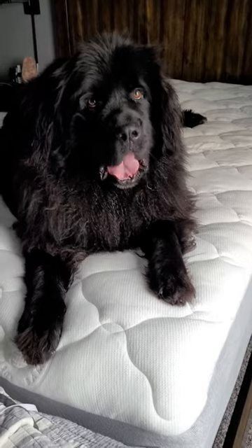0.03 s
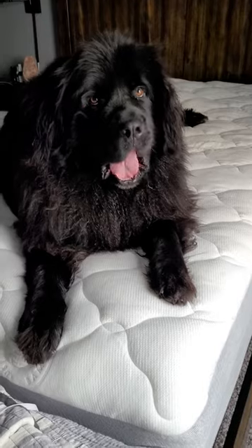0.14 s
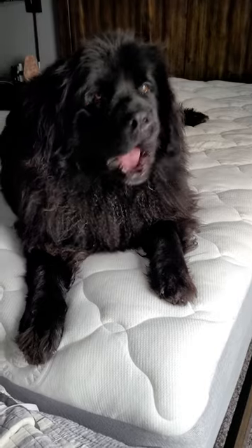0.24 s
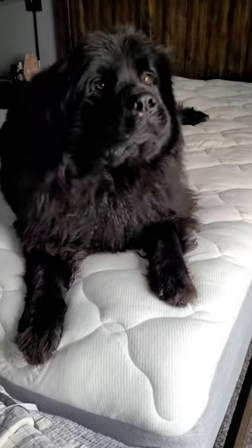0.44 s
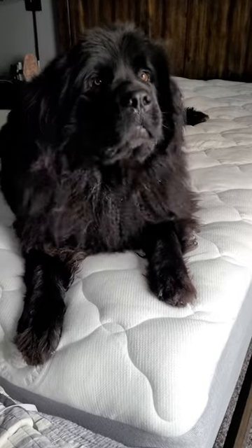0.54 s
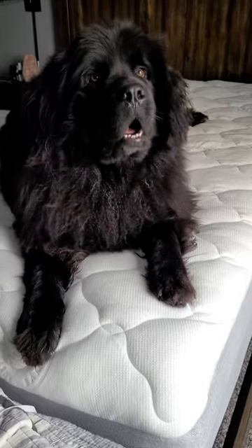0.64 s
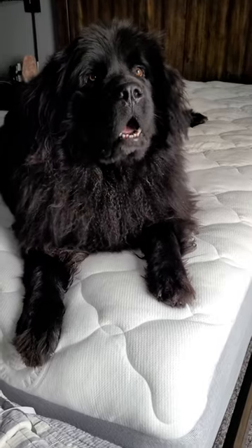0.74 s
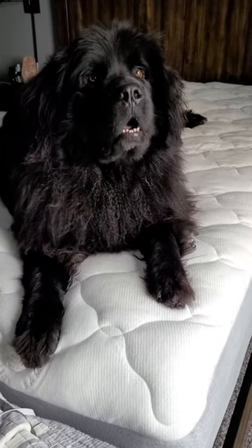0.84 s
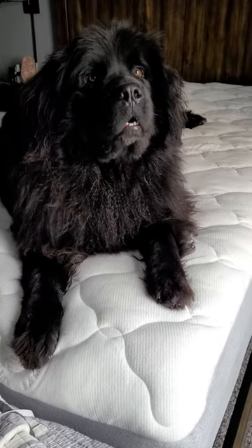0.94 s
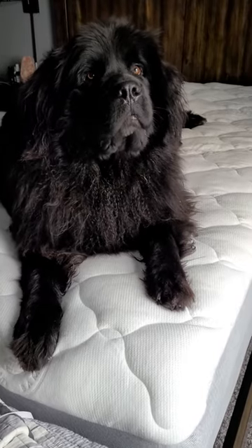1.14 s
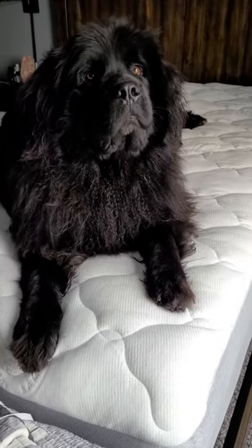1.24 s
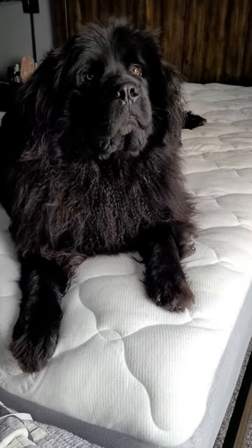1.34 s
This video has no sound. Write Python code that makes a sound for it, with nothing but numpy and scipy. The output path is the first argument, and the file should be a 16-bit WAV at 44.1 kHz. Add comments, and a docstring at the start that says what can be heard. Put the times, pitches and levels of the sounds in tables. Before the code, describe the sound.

A large dog gives one deep, loud bark between panting breaths in a small humming room

```python
"""In a small furnished room with a mains hum, a large dog on a bed gives one deep bark between panting breaths.
Pants are swells of coloured noise. The bark climbs from a closed-mouth growl, the jaws snap open, and
a second, falling tone takes over: two sums of overtones with a sum tone and pulsed air. Air hisses out after it.
Wall echoes and a decaying noise tail make the room. A phone's two ports hear it; its gain control
ducks under the bark and creeps back."""
import sys
import numpy as np
from scipy import signal
from scipy.fft import rfft, irfft, next_fast_len
from scipy.io import wavfile
from scipy.ndimage import uniform_filter1d, minimum_filter1d, map_coordinates

SR = 44100
rng = np.random.default_rng(int(sys.argv[2]) if len(sys.argv) > 2 else 0)


def dump_mix(stems):
    """Bounce the given channels to the path in sys.argv[1] as a 16-bit WAV at rate SR."""
    frames = np.atleast_2d(stems).T  # one column per channel
    limited = np.clip(frames, -1, 1)  # hard clip at full scale
    pcm = np.round(limited * 32767).astype(np.int16)
    wavfile.write(sys.argv[1], SR, pcm)


N = 61739
TOP_HZ = 15620  # upper band limit
RIGHT_LAG_S = 0.00013  # later arrival at the right port

# Opening of the jaws. Each row: time in seconds, opening from 0 (shut) to 1 (open).
MOUTH = [(.223, 0), (.227, 1), (.335, 1), (.355, .5), (.4, .2)]


def amp(db):
    """Level to gain: 20 dB is a factor of ten in amplitude."""
    return 10 ** (np.asarray(db) / 20)


def unit(x):
    """Normalise power: scale to rms 1."""
    return x / np.sqrt(np.mean(x ** 2) + 1e-20)


def along(points, hz):
    """Spectral envelope: interpolate (Hz, value) points on a logarithmic frequency axis."""
    f, values = np.transpose(points)
    return np.interp(np.log(hz + 1), np.log(f + 1), values)


def curves(rows):
    """Temporal envelope: one value per sample for each column after the time in seconds."""
    seconds, *columns = np.transpose(rows)
    return [np.interp(np.arange(N) / SR, seconds, column) for column in columns]


def wobble(rate):
    """Band-limited fluctuation: a smooth curve through random knots, rate of them a second."""
    knots = rng.standard_normal(int(N * rate / SR) + 4)
    return map_coordinates(knots, [np.arange(N) * rate / SR])


def filtered(x, response):
    """Linear filtering: multiply the spectrum by a complex response of frequency."""
    size = next_fast_len(N + SR // 2)
    spectrum = rfft(x, size) * response(np.fft.rfftfreq(size, 1 / SR))
    return irfft(spectrum, size)[..., :N]


def noise(spectrum):
    """Spectral shaping: coloured noise of rms 1, rolled off steeply below the first point."""
    def colour(hz):
        low_cut = np.minimum(1, hz / spectrum[0][0]) ** 4
        return amp(along(spectrum, hz)) * low_cut
    return unit(filtered(rng.standard_normal(N), colour))


def background():
    """Superposition and coherence: a steady two-tone hum over room tone partly alike at the two ports."""
    # Colour of the room tone. Each row: frequency in Hz, relative level in dB.
    air_colour = [(22, 0), (45, -1), (70, -8), (110, -10), (160, -13), (200, -11), (280, -18), (460, -12),
                  (600, -18), (740, -23), (850, -30), (1150, -38), (1320, -29), (1500, -39), (2500, -46),
                  (4000, -53), (9000, -55), (12500, -48), (15500, -57)]
    # Likeness of the room tone left and right. Each row: frequency in Hz, correlation from 0 to 1.
    alike = [(30, .8), (200, .95), (1000, .8), (4000, .4), (12000, .2)]
    hum_hz, hum_db, sixth_db = 119.8, -47, -32  # sixth harmonic relative to the fundamental
    air_db = -57.5

    t = np.arange(N) / SR - np.array([[0], [RIGHT_LAG_S]])
    fundamental = np.sin(2 * np.pi * hum_hz * t)
    sixth = amp(sixth_db) * np.sin(12 * np.pi * hum_hz * t)
    hum = np.sqrt(2) * amp(hum_db) * (fundamental + sixth)

    def mid_side(hz):
        # the cosine of twice this angle is the left-right correlation
        angle = np.arccos(np.clip(along(alike, hz), -1, 1)) / 2
        return np.array([np.cos(angle), np.sin(angle)])
    mid, side = filtered(np.array([noise(air_colour), noise(air_colour)]), mid_side)
    return hum + amp(air_db) * np.array([mid + side, mid - side])


def pants():
    """Turbulent flow through the mouth: each breath is a swell of coloured noise."""
    # Breaths. Each row: start, peak and end in seconds, level in dB at the peak before flutter.
    # A row whose end comes before its start stays silent.
    breaths = [(-.05, .045, 0.062, -50), (.54, .63, 0.68, -49.5), (.72, .82, 0.93, -74.5),
               (1.04, 1.11, 0.94, -75.5), (1.19, 1.24, 1.293, -79.5), (1.32, 1.39, 1.45, -71.5)]
    # Colour of the breath before the bark. Each row: frequency in Hz, relative level in dB.
    before = [(180, -23), (300, -5), (437, -20), (750, 0), (991, -14.5), (1850, -2), (2560, -17),
              (2780, -11.5), (3120, -25), (6200, -28), (7420, -33), (8600, -29.5), (15000, -43)]
    # Colour of the whistling breath after the bark. Each row: frequency in Hz, relative level in dB.
    whistling = [(410, -62), (700, -14), (786, -10), (1180, -21), (1350, 2), (1510, -16), (2190, -15.5),
                 (2940, -43.5), (3140, -22.5), (5170, -46), (5880, -33), (6350, -35), (15000, -42)]
    # Colour of the faint breaths at rest. Each row: frequency in Hz, relative level in dB.
    faint = [(700, -17), (1100, -10), (1320, 6), (1550, -12), (1900, 3), (2200, -9), (2650, -6),
             (3000, -17), (6000, -19), (15000, -48.5)]
    colours = [before, whistling, faint]

    t, out = np.arange(N) / SR, np.zeros(N)
    for k, (start, top, end, db) in enumerate(breaths):
        swell = np.sin(np.pi / 2 * np.interp(t, [start, top, end], [0, 1, 0])) ** 2
        level = amp(db + 1.3 * wobble(45))
        out += level * swell * noise(colours[min(k, 2)])
    return out


def folds(pitch):
    """Vocal-fold oscillation: the running phase is the integral of a slightly jittered pitch."""
    jitter = .004  # rms share of the pitch, at the knots
    hz, = curves(pitch)
    phase = 2 * np.pi * np.cumsum(hz * (1 + jitter * wobble(120))) / SR
    return hz, phase


def voice(rows, hz, phase):
    """Source and filter: harmonics of the folds weighted by the throat as the mouth opens."""
    # Throat with the mouth open. Each row: frequency in Hz, gain in dB.
    throat_open = [(120, -14), (250, -10.5), (480, -1), (620, 0), (820, -3), (1050, -12), (1400, -12),
                   (1800, -11), (2100, -17), (2500, -26.5), (3000, -53), (3900, -37.5), (4700, -49),
                   (6500, -41.5), (15500, -80)]
    # Throat with the mouth shut. Each row: frequency in Hz, gain in dB.
    throat_shut = [(120, -13.5), (350, 0), (700, -5), (1200, -20.5), (1500, -46.5), (2300, -39.5),
                   (3500, -70), (15500, -90)]
    shimmer_db = 1  # rms fluctuation of the level, at the knots

    db, odd_db, upper_db = curves(rows)
    mouth, = curves(MOUTH)
    live = db > db.min()
    k = np.arange(1, 41)[:, None]  # harmonic number
    f, opening = k * hz[live], mouth[live]
    throat_db = opening * along(throat_open, f) + (1 - opening) * along(throat_shut, f)
    source_db = odd_db[live] * (k % 2) + upper_db[live] * (k > 1)
    gains = amp(throat_db + source_db) * (f < TOP_HZ)
    harmonics = np.sin(k * phase[live] + np.pi * k * k / 4)  # staggered starting phases
    tone = np.zeros(N)
    tone[live] = np.sum(gains * harmonics, axis=0)
    return amp(db + shimmer_db * wobble(90)) * tone


def rasp(phase):
    """Modulated turbulence: air gated once a cycle of the folds leaves by the open mouth or the nose."""
    # Air through the folds. Each row: time in seconds, level in dB for the mouth, level in dB for the nose,
    # both before flutter, jaw opening and colour.
    rush = [(.167, -80, -90.5), (.170, -60, -43.5), (.195, -60, -46.5), (.221, -33, -55.5), (.228, 0, -71),
            (.245, 3.5, -70), (.265, 7, -70), (.285, 2.5, -70), (.335, -7, -69), (.35, -16.5, -73),
            (.38, -27, -65), (.42, -61.5, -94)]
    # Colour of the air in the open mouth. Each row: frequency in Hz, gain in dB.
    mouth_colour = [(200, -56.5), (400, -30), (800, -15), (1100, -15), (1600, -15.5), (2300, -19),
                    (2700, -29.5), (3000, -60), (3500, -43.5), (3900, -36), (4600, -62), (5200, -40),
                    (5700, -44.5), (6500, -29), (7500, -42.5), (8500, -38), (10000, -43.5), (12500, -37.5),
                    (14500, -68), (15500, -83)]
    # Colour of the air escaping with the mouth shut. Each row: frequency in Hz, gain in dB.
    nose_colour = [(300, -10.5), (1200, -7.5), (1500, -40.5), (2300, -30), (2800, -13.5), (3800, -10),
                   (4800, -40.5), (5500, -6), (6100, 2.5), (6700, -8.5), (7200, -40.5), (8700, -24),
                   (15500, -51)]

    mouth, = curves(MOUTH)
    open_db, shut_db = curves(rush) + 3.7 * wobble(70)
    gate = (1.2 + np.cos(phase)) ** 3
    air = unit(gate * rng.standard_normal(N))
    by_mouth = filtered(mouth * amp(open_db) * air, lambda hz: amp(along(mouth_colour, hz)))
    by_nose = filtered((1 - mouth) * amp(shut_db) * air, lambda hz: amp(along(nose_colour, hz)))
    return by_mouth + by_nose


def bark():
    """Coupled tones: a rising and a falling oscillator overlap with a sum tone, over rasping air."""
    # Strength of the rising voice. Each row: time in seconds, level in dB, boost of the odd harmonics in dB,
    # boost of all harmonics above the first in dB.
    rising = [(.166, -70.5, 0.5, -5), (.171, -32, -5, -2.5), (.198, -36.5, 2.5, -5), (.212, -19.5, -2, 3.5),
              (.232, -9.5, 0, 5), (.244, 4, -25.5, 1.5), (.264, 1.5, -28, 0), (.276, -24, -23, -1),
              (.29, -70.5, -28, -4.5)]
    # Strength of the falling voice. Each row: time in seconds, level in dB, boost of the odd harmonics in dB,
    # boost of all harmonics above the first in dB.
    falling = [(.228, -71, -1.5, -27.5), (.24, -4.5, 1.5, -25.5), (.264, 1, -0.5, -25), (.28, 7, 2, -5.5),
               (.3, 3.5, 2, -1), (.324, -1.5, 0.5, -4), (.35, -4.5, -0.5, 3), (.362, -16.5, -6, -10),
               (.38, -24, 1.5, -13), (.402, -26, 1.5, -3), (.42, -72, 17.5, -18)]
    # Pitch of the rising voice. Each row: time in seconds, frequency in Hz before jitter.
    rising_hz = [(.166, 165), (.186, 218), (.198, 254), (.212, 312), (.232, 385), (.246, 425), (.258, 440),
                 (.272, 458), (.29, 470)]
    # Pitch of the falling voice. Each row: time in seconds, frequency in Hz before jitter.
    falling_hz = [(.226, 548), (.262, 520), (.283, 500), (.3, 460), (.324, 411), (.35, 350), (.368, 286),
                  (.402, 185), (.42, 160)]
    sum_tone_db = -11.5  # relative to the product of the two voices' levels

    up_hz, up = folds(rising_hz)
    down_hz, down = folds(falling_hz)
    both_db = curves(rising)[0] + curves(falling)[0] + sum_tone_db
    sum_tone = amp(both_db) * np.sin(2 * up + down)  # twice the rising plus the falling pitch
    return voice(rising, up_hz, up) + voice(falling, down_hz, down) + sum_tone + rasp(up)


def nose_hiss():
    """Turbulent flow through the nose: a low and a high band of noise flutter together after the bark."""
    # Strength of the hiss. Each row: time in seconds, low hiss in dB, high hiss in dB, both before flutter.
    strength = [(0.34, -61, -54), (0.346, -58, -67.5), (0.38, -45.5, -64), (0.424, -45, -49.5),
                (0.506, -54, -53), (0.582, -58.5, -67), (0.614, -58, -64), (0.7, -99, -109)]
    # Colour of the low hiss. Each row: frequency in Hz, relative level in dB.
    low_colour = [(1470, -39), (2500, -13), (3070, -17), (3140, -27.5), (3380, -13), (5010, -11),
                  (6360, -6.5), (8000, -34), (10400, -51), (17600, -120)]
    # Colour of the high hiss. Each row: frequency in Hz, relative level in dB.
    high_colour = [(4820, -37), (8200, -12), (11900, -0.5), (13400, -8), (14800, -21.5), (15500, -41)]

    low_db, high_db = curves(strength) + 3.5 * wobble(58)
    fade_in = np.clip((np.arange(N) / SR - strength[0][0]) / .03, 0, 1)
    return fade_in * (amp(low_db) * noise(low_colour) + amp(high_db) * noise(high_colour))


def room(x):
    """Reflection and reverberation: direct sound, wall echoes and a diffuse tail that dies by band."""
    # Nearby walls. Each row: delay in ms left, gain as a factor left, delay in ms right, gain as a factor right.
    walls = [(1.019, 0.35, 1.9, -0.2), (3.68, -0.44, 4.6, 0.64), (7.409, 0.52, 9.3, -.4),
             (12.11, -0.71, 11.2, 0.19), (17.534, 0.46, 19, -0.026), (24.34, 0.19, 16, -0.36),
             (33.6, -0.23, 31, 0.16)]
    # Diffuse tail. Each row: frequency in Hz, time to fall by 60 dB in seconds, relative level in dB.
    decay = [(200, .28, -9), (306.7, 0.66, -6), (400, .34, 2), (474, 0.41, -3.5), (577.8, 0.14, -13),
             (725, .4, 3), (910, 0.2, -7), (1142, 0.42, 2.5), (1500, 0.16, -8), (1903, .32, 5.5),
             (2230, .25, -9), (2510, 0.44, 5.5), (3040, .2, -7), (6000, 0.37, -2.5), (14000, .1, -9)]
    tail_db, tail_start_s = -7, .02

    left_ms, left_gain, right_ms, right_gain = np.transpose(walls)

    def echo(hz, ms, gain):
        return np.exp(-2j * np.pi * hz[:, None] * ms / 1000) @ gain

    def early(hz):
        left = 1 + echo(hz, left_ms, left_gain)
        right = np.exp(-2j * np.pi * hz * RIGHT_LAG_S) + echo(hz, right_ms, right_gain)
        return np.array([left, right])
    near = filtered(x, early)

    hz, t, grains = signal.stft(rng.standard_normal((2, SR // 2)), SR, nperseg=512)
    t60, colour_db = (along(np.array(decay)[:, [0, column]], hz)[:, None] for column in (1, 2))
    dying = grains * amp(colour_db - 60 * t / t60)
    tail = signal.istft(dying, SR, nperseg=512)[1] * np.sqrt(20 / SR)
    late = np.pad(x, (round(tail_start_s * SR), 0))[None]
    return near + amp(tail_db) * signal.fftconvolve(late, tail, axes=1)[:, :N]


def scene():
    """Superposition: the dog in the room plus the background, with the left port less sensitive."""
    left_db = -1.17
    dog = bark() + pants() + nose_hiss()
    return (room(dog) + background()) * amp([[left_db], [0]])


def record(dry):
    """Dynamic compression: gain ducks fast and recovers steadily; a limiter and a band limit follow."""
    duck_from_db, duck_share, duck_window_s = -15.5, 0.51, 0.071  # share of the excess level removed
    recover_db_per_s, ceiling = 5.5, 0.97  # limiter ceiling as amplitude before the band limit

    power = uniform_filter1d(np.mean(dry ** 2, axis=0), round(duck_window_s * SR))
    level_db = 10 * np.log10(np.abs(power) + 1e-12)
    wanted_db = duck_share * np.maximum(level_db - duck_from_db, 0)
    # a running maximum against a rising ramp lets the reduction fall only at the recovery rate
    creep_db = recover_db_per_s * np.arange(N) / SR
    duck_db = np.maximum.accumulate(wanted_db + creep_db) - creep_db
    ducked = dry * amp(-duck_db)

    need = np.minimum(1, ceiling / (np.abs(ducked).max(axis=0) + 1e-9))
    limit = uniform_filter1d(minimum_filter1d(need, size=441), size=221)  # windows in samples
    return filtered(ducked * limit, lambda hz: hz < TOP_HZ)


dry = scene()
out = record(dry)
dump_mix(out)
```